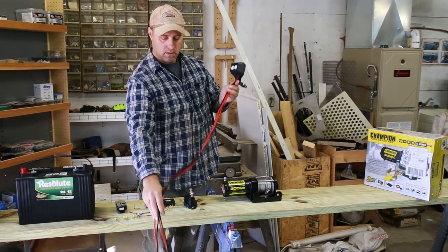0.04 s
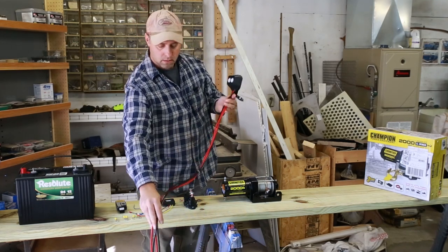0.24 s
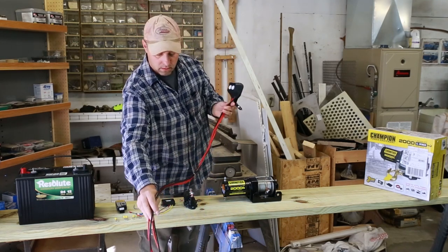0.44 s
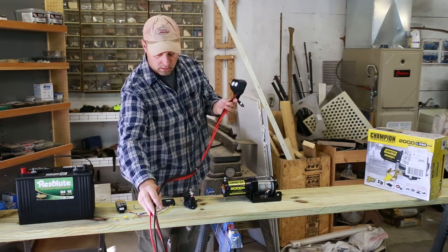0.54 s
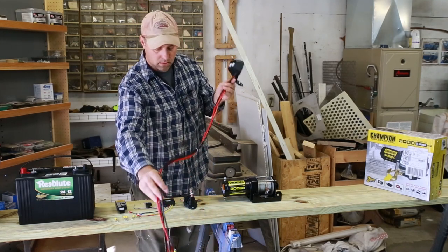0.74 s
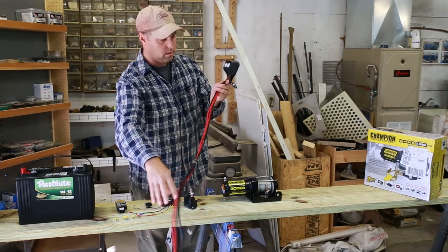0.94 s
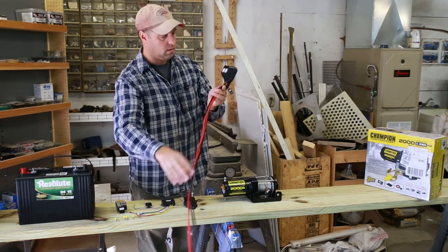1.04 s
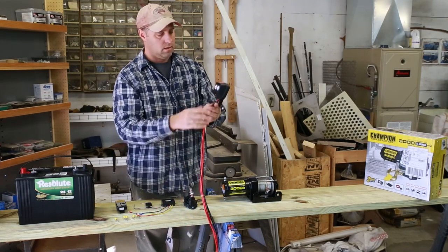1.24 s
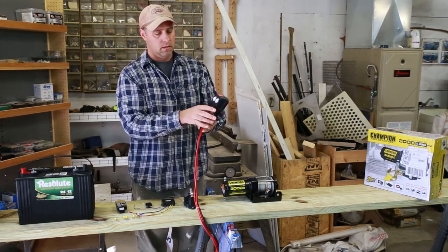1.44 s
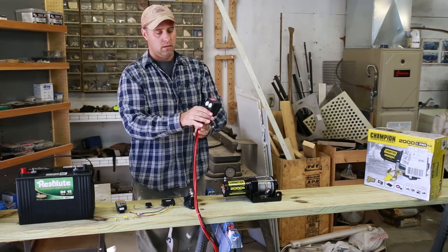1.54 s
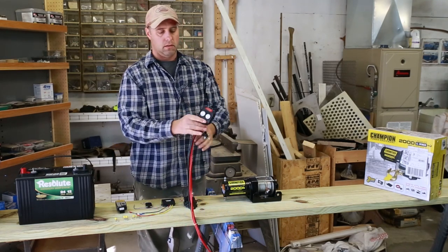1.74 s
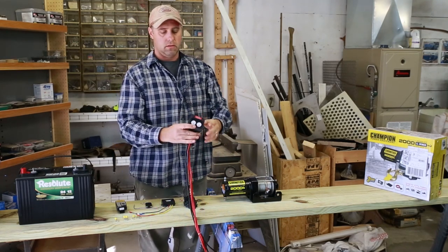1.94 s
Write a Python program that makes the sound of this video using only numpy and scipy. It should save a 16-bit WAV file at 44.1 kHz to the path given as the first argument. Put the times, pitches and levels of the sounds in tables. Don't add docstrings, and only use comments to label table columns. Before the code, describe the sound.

Spaced dull cable slaps with soft rubbing, a quick rattling cluster, then light plastic clicks ending in one sharp snap; short room tails, low rumble, thin noise-reduced air, left channel only.

```python
import sys
import numpy as np
from scipy import signal
from scipy.io import wavfile
from scipy.ndimage import uniform_filter1d

SR = 44100
rng = np.random.default_rng(int(sys.argv[2]) if len(sys.argv) > 2 else 0)


def to_wav(sig):
    pcm = np.clip(np.atleast_2d(sig), -1, 1) * 32767
    pcm = np.round(pcm).astype(np.int16)
    wavfile.write(sys.argv[1], SR, pcm.T)


def level_to_linear(level):
    exponent = np.asarray(level, float) / 20
    return 10 ** exponent


N = 88200
CONTACT_RISE_S, RUB_EDGE_S = 0.0012, 0.0091


def at_hz(points, hz):
    points = np.array(points)
    return np.interp(np.log(hz), np.log(points[:, 0]), points[:, 1])


def rms_one(x):
    return x / np.sqrt(np.mean(x ** 2) + 1e-20)


def cut(x, hz, kind):
    return signal.sosfilt(signal.butter(4, hz, kind, fs=SR, output="sos"), x)


def band(x, hz, sharpness):
    edge = 1 + 0.5 / max(sharpness, 0.3)
    limits_hz = [hz / edge, min(hz * edge, 0.45 * SR)]
    return signal.sosfilt(signal.butter(3, limits_hz, "band", fs=SR, output="sos"), x)


def in_bands(spectrum_db, lowest_hz, count):
    lead_in = 4000
    white = rng.standard_normal((2, N + lead_in))
    out = 0
    for k in range(count):
        hz = lowest_hz * 2 ** (k / 3)
        limits_hz = [hz * 2 ** (-1 / 6), hz * 2 ** (1 / 6)]
        sos = signal.butter(2, limits_hz, "band", fs=SR, output="sos")
        out = out + level_to_linear(spectrum_db(hz)) * signal.sosfilt(sos, white[k % 2])[lead_in:]
    return out


def impulses(start_s, level_db):
    out = np.full(N, 1e-18)
    np.add.at(out, (np.asarray(start_s) * SR).astype(int), level_to_linear(level_db))
    return out


def ring(x, hz, t60_s):
    radius = level_to_linear(-60 / (t60_s * SR))
    angle = 2 * np.pi * hz / SR
    return signal.lfilter([0, np.sin(angle)], [1, -2 * radius * np.cos(angle), radius ** 2], x)


def struck(start_s, level_db, modes):
    scatter_db = rng.normal(0, 1.5, (len(start_s), len(modes)))
    out = np.zeros(N)
    for k, (hz, mode_db, t60_s) in enumerate(modes):
        out += ring(impulses(start_s, level_db + mode_db + scatter_db[:, k]), hz, t60_s)
    return out


# pitch_hz [Hz], level_db [dB per Hz]
RUMBLE_SPECTRUM = [(12, -31), (20, 1.5), (48, 5), (76, 3.5), (162, -21), (200, -28.5), (260, -26),
                   (440, -120)]


def background():
    rumble = rms_one(in_bands(lambda hz: at_hz(RUMBLE_SPECTRUM, hz), 20.57, count=11))
    hum = rms_one(band(rng.standard_normal(N), hz=146, sharpness=18))
    return level_to_linear(-62) * rumble + level_to_linear(-80) * hum


# pitch_hz [Hz], level_db [dB per Hz]
AIR_SPECTRUM = [(120, -33), (200, 2), (599, -1), (729, -11.5), (1120, 2.5), (1290, -8.5), (2450, -2.5),
                (3930, -25.5), (10000, -27), (13000, -65), (22000, -120)]
# start_s [s], level_db [dB]
AIR_LEVEL = [
    (0.0, -54.5),
    (0.25, -74),
    (0.38, -64),
    (0.59, -86),
    (1.29, -67),
    (1.41, -50),
    (1.63, -76.5),
    (1.89, -61),
    (2.0, -50),
]


def residual_air():
    start_s, level_db = np.transpose(AIR_LEVEL)
    rise_db = np.interp(np.arange(N) / SR, start_s, level_db - level_db.min())
    swell_db = 0.32 * np.clip(rise_db, 0, 20)
    air = rms_one(in_bands(lambda hz: at_hz(AIR_SPECTRUM, hz), 172.7, count=19))
    return 2 * level_to_linear(-82 + swell_db) * air


# delay_s [s], level_db [dB]
REFLECTIONS = [
    (.0022, -6),
    (.008, -10),
    (.0101, -17),
]
# pitch_hz [Hz], t60_s [s]
ROOM_DECAY = [(100, 0.25), (300, 0.21), (700, 0.43), (1500, 0.32), (3000, 0.33), (6000, 0.22), (12000, 0.1)]


def workshop(bench, hands):
    bench_db, hands_db, onset_s = 1, -12.5, 0.0023
    t = np.arange(N) / SR
    tail = rms_one(in_bands(lambda hz: -60 * t / at_hz(ROOM_DECAY, hz), 72.93, count=24)) / np.sqrt(N)
    tail *= 1 - np.exp(-t / onset_s)
    early = impulses(*np.transpose([(0.0, 0.018), *REFLECTIONS]))[:2000]
    direct = signal.fftconvolve(bench + hands, early)[:N]
    sent = level_to_linear(bench_db) * bench + level_to_linear(hands_db) * hands
    return direct + signal.fftconvolve(sent, tail)[:N]


# start_s [s], length_s [s], level_db [dB], pitch_hz [Hz], sharpness [ratio]
CHATTER = [(0.27, 0.022, -68.5, 1700, 2.1), (0.27, 0.036, -77.5, 7300, 3), (0.23, 0.037, -69.5, 4040, 2.8),
           (0.23, 0.026, -62, 286, 1.56), (0.47, 0.052, -65, 603, 1.46), (0.31, .04, -63, 153, 3),
           (.855, 0.02, -52.5, 2400, 1.9), (.855, 0.025, -54, 760, 1.9), (0.58, 0.017, -59.5, 1700, 3),
           (0.83, 0.029, -53, 720, 0.95), (.86, 0.029, -63, 3150, 0.94), (1.272, 0.028, -41, 2110, 1.17),
           (1.261, 0.09, -61.5, 4530, 0.75), (1.276, 0.05, -79.5, 12040, 2.3),
           (1.36, 0.079, -52.5, 883, 0.5), (1.441, 0.029, -62.5, 270, 2.23),
           (1.533, 0.055, -59.5, 855, 1.18), (1.542, 0.056, -74, 3230, 2.3)]


def after_slaps():
    slap_s = np.transpose(SLAPS)[0]
    strokes = []
    for start_s, *rest in CHATTER:
        nearest_s = slap_s[np.argmin(np.abs(slap_s - start_s))]
        strokes.append((max(start_s, nearest_s + RUB_EDGE_S / 2), *rest))
    return strokes


# start_s [s], length_s [s], level_db [dB], pitch_hz [Hz], sharpness [ratio]
RUBS = [(.0, 0.023, -70, 1240, 1), (.0, 0.29, -76, 2620, 5.6), (0.055, 0.082, -59.5, 1685, 0.59),
        (0.025, 0.0675, -60, 324, 2.55), (.11, 0.017, -69.5, 5600, 3.7), (0.056, .06, -77.5, 4350, 2.2),
        (.236, 0.015, -67.5, 2695, 5.6), (0.772, 0.14, -71, 2407, 1.7), (0.823, 0.092, -66.5, 1620, 0.66),
        (0.799, 0.029, -63, 296.3, 6.3), (1.026, .1, -76.5, 1620, 5.8), (1.075, 0.052, -81, 3420, 3.1),
        (1.21, 0.14, -57, 1935, 0.66), (1.701, 0.063, -62, 250, 2.6), (1.706, 0.087, -75.5, 3241, 1.14),
        (1.796, 0.066, -63.5, 3056, 0.95), (1.813, 0.044, -86.5, 12730, 46),
        (1.819, 0.075, -75, 6250, 1.66)]
# start_s [s], length_s [s], level_db [dB], pitch_hz [Hz],
# sharpness [ratio]
BRUSHES = [(-.06, 0.1, -69, 1260, 2.6), (-.05, 0.11, -81, 2760, 2.5), (0.794, .055, -64.5, 1380, 1.16),
           (0.804, 0.043, -83.5, 5450, 1.08), (1.382, 0.135, -68.5, 3040, 1.01),
           (1.616, 0.17, -78.5, 2490, 1.1), (1.625, 0.14, -86.5, 5850, 2.2),
           (1.845, 0.043, -87, 10200, 4.2), (1.941, 0.05, -73, 9360, 1.2), (1.248, 0.093, -50, 736, 1.64),
           (0.286, 0.11, -74, 2430, 4.5)]


def rubs():
    grains_per_s, spread_db = 2500, 7
    out = np.zeros(N)
    t = np.arange(N) / SR
    for start_s, length_s, level_db, hz, sharpness in [*RUBS, *after_slaps(), *BRUSHES]:
        size = level_to_linear(spread_db * np.minimum(rng.exponential(1, N), 4)) * rng.choice([-1, 1], N)
        slips = size * (rng.random(N) < grains_per_s / SR)
        grains = rms_one(band(slips, hz, sharpness))
        to_edge_s = np.minimum(t - start_s, start_s + length_s - t)
        stroke = np.clip(to_edge_s / RUB_EDGE_S + 0.5, 0, 1) ** 2
        out += level_to_linear(level_db) * grains * stroke
    return out


# [share, dB]
CLICKS = [(1.6326, -54, -31, -39), (1.6356, -70.5, 7.5, -45), (1.709, -58.5, -21.5, -52),
          (1.7843, -55, 2, -61), (1.7904, -69, -20, -61), (1.7997, -35, -4.5, -60), (1.8076, -71, -7, -53),
          (1.819, -56, -5, -36), (1.8256, -52.5, -7, -48), (1.8514, -65, -32, -42),
          (1.8545, -45.5, -40, -50), (1.936, -19.5, -14, -20.5)]
# pitch_hz [Hz], level_db [dB], t60_s [s]
SHELL_BODY = [(2380, -27.5, 0.036), (3410, 2, 0.0039), (4110, -2.5, 0.0036), (4400, -10.5, 0.013)]
SHELL_BRIGHT = [(5810, 3.5, 0.014), (6920, 3.5, 0.0055), (7600, -12, 0.012)]
SHELL_AIRY = [(10200, 8, 0.0026), (11500, 0, 0.0021), (13400, -17, 0.0032), (13800, -18, 0.0052)]


def clicks():
    body_db, top_db = -2.5, -8.5
    start_s, level_db, bright_db, airy_db = np.transpose(CLICKS)
    start_s = start_s + CONTACT_RISE_S
    body = struck(start_s, level_db + body_db, SHELL_BODY)
    bright = struck(start_s, level_db + bright_db + top_db, SHELL_BRIGHT)
    airy = struck(start_s, level_db + airy_db + top_db, SHELL_AIRY)
    body = cut(cut(body, 2150, "high"), 5400, "low")
    bright = cut(cut(bright, 6260, "high"), 7700, "low")
    return body + bright + cut(airy, 7700, "high")


# [plank, dB]
SLAPS = [(0.06, -40, 1194, -7), (0.269, -30, 2185, -19.5), (0.552, -36, 1490, -16), (0.807, -57, 1420, 3.5),
         (0.85, -26.5, 1250, -11), (1.049, -51.5, 1610, -32), (1.221, -46.5, 1720, -19),
         (1.254, -25, 1350, -14.5), (1.272, -25, 1204, -12.5), (1.282, -34.5, 1160, -11),
         (1.29, -27, 1870, -20), (1.302, -43, 1920, -24), (1.311, -30, 1950, -4), (1.534, -39, 1870, -5)]
# pitch_hz [Hz], level_db [dB], t60_s [s]
PLANK = [(93.4, -6, 0.11), (194.4, -17, 0.035), (275.4, 2, 0.054), (335.6, 4, 0.035), (634, -3, 0.032),
         (807, -7, 0.023), (856.5, -8, 0.063)]


def slaps():
    contact_db, plank_db, thud_delay_s = 1.5, -5.5, 0.002825
    contact = np.zeros(N)
    click = impulses([0.0], [0.0])[:2000]
    for start_s, level_db, hz, _ in SLAPS:
        pulse = band(click, hz, sharpness=1.023)
        i = int((start_s + CONTACT_RISE_S) * SR)
        contact[i:i + 2000] += level_to_linear(level_db + contact_db) * pulse / np.abs(pulse).max()
    start_s, level_db, _, thud_db = np.transpose(SLAPS)
    thud = struck(start_s + thud_delay_s, level_db + thud_db + plank_db, PLANK)
    return cut(contact, 2960, "low") + cut(cut(thud, 800, "low"), 70, "high")


def scene():
    heard = workshop(slaps() + rubs(), clicks()) + background()
    return np.array([2 * heard, 0 * heard])


# pitch_hz [Hz], level_db [dB]
GATE = [(150, -100), (300, -80.5), (700, -76), (1500, -76.5), (3000, -81.5), (5000, -91), (8000, -87),
        (13000, -96.5)]


def suppress(x):
    depth_db, slope = 13, 2.5
    hz, _, z = signal.stft(x, SR, nperseg=1024, noverlap=768)
    power = uniform_filter1d(np.abs(z) ** 2, size=5, axis=0)
    power = uniform_filter1d(power, size=3, axis=1)
    above_db = 10 * np.log10(power + 1e-20) - at_hz(GATE, np.maximum(hz, 1))[:, None]
    gain = level_to_linear(np.clip(slope * above_db, -depth_db, 0))
    return signal.istft(z * gain, SR, nperseg=1024, noverlap=768)[1][:N]


def band_limit(x):
    return signal.sosfilt(signal.butter(12, 16310, fs=SR, output="sos"), x)


def record(dry):
    left = suppress(dry[0]) + residual_air()
    return band_limit(np.array([left, dry[1]]))


dry = scene()
out = record(dry)
to_wav(out)
```